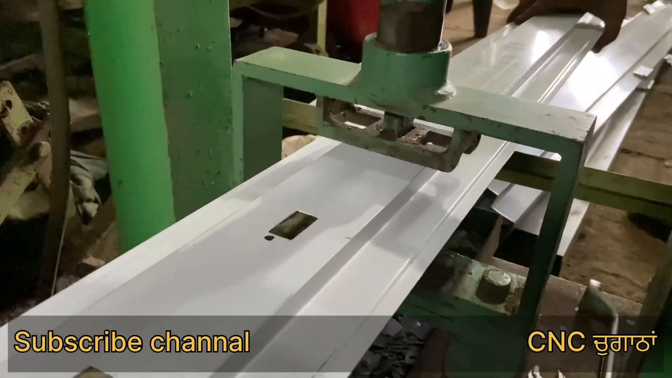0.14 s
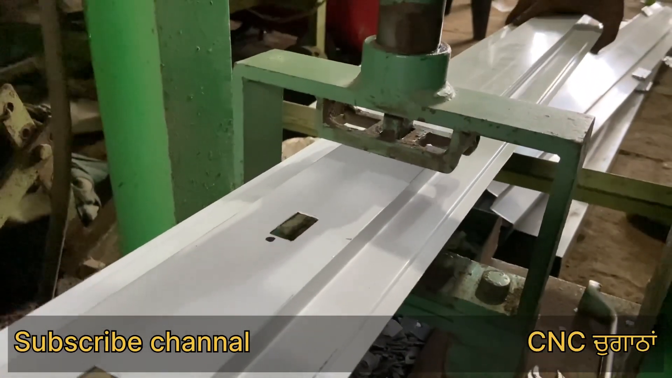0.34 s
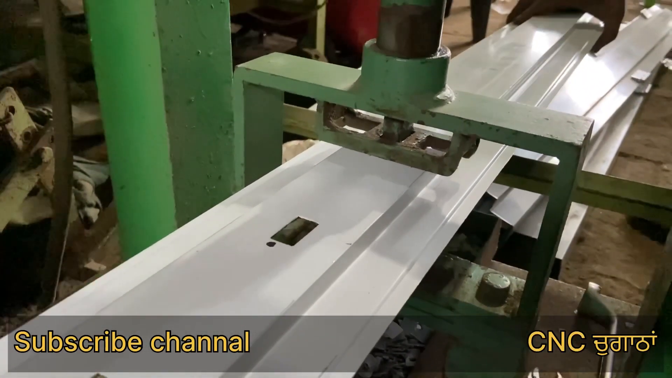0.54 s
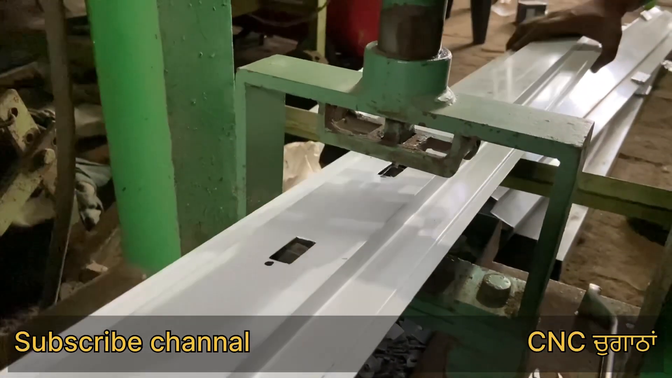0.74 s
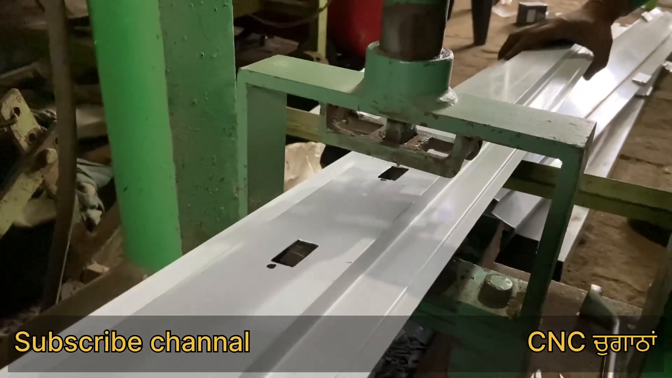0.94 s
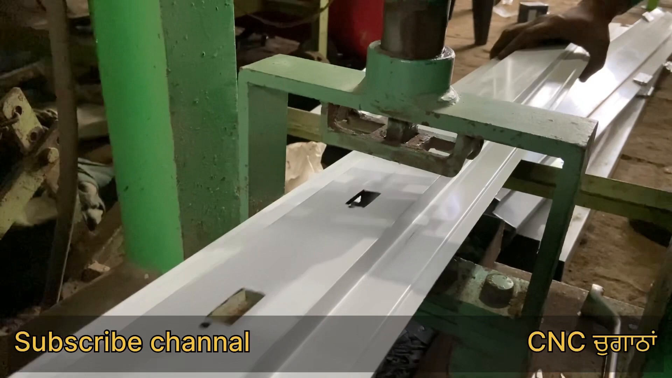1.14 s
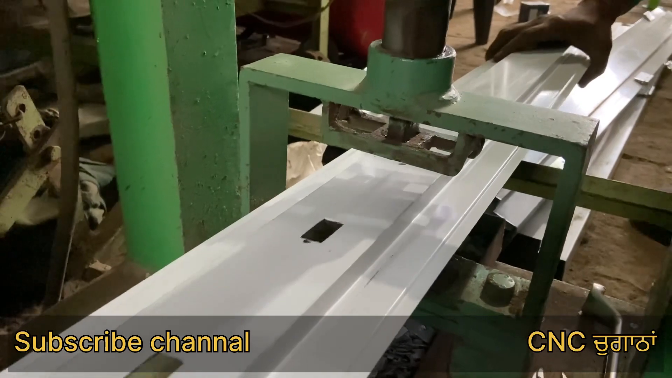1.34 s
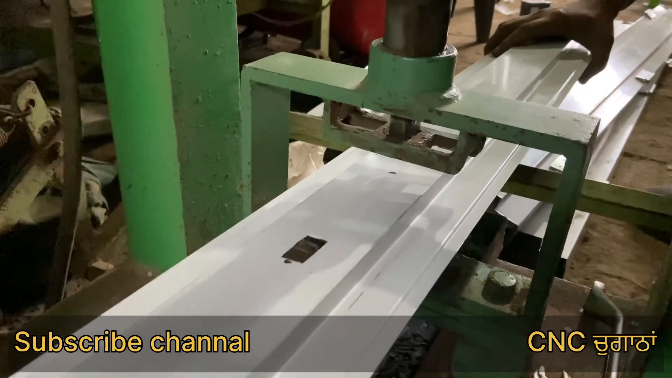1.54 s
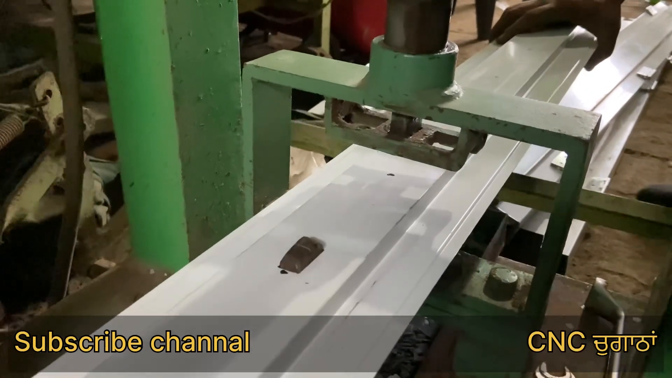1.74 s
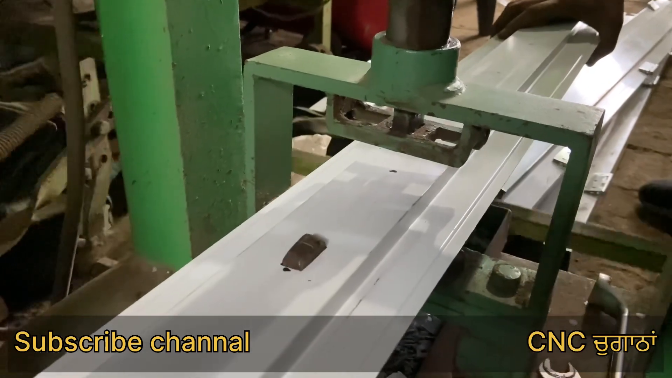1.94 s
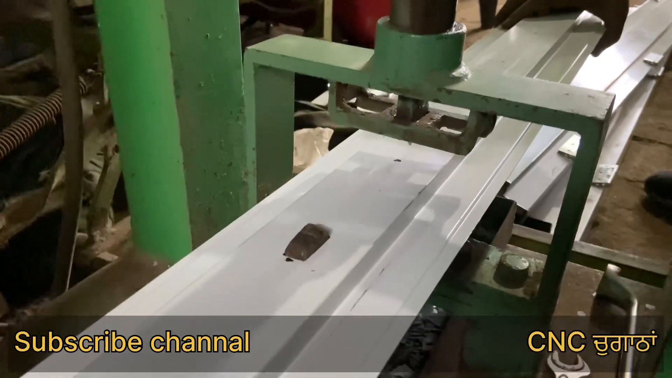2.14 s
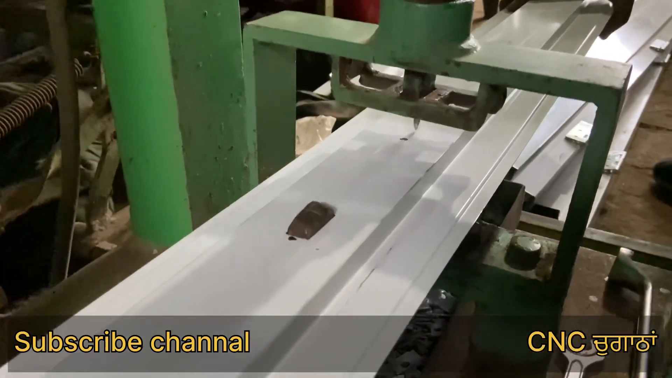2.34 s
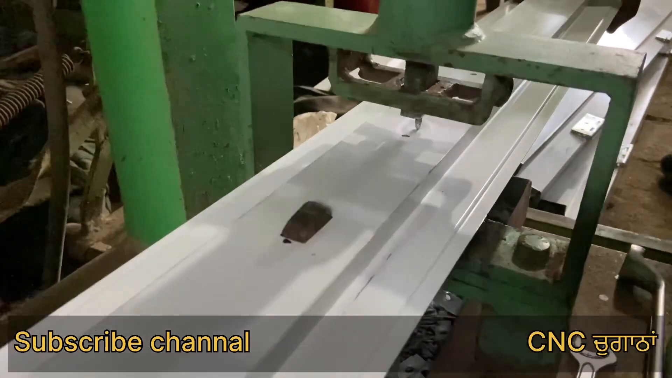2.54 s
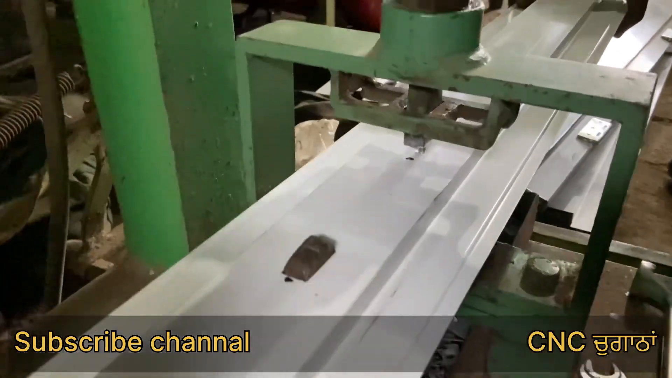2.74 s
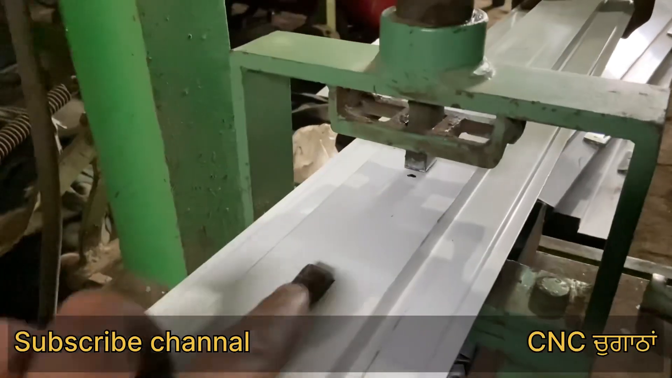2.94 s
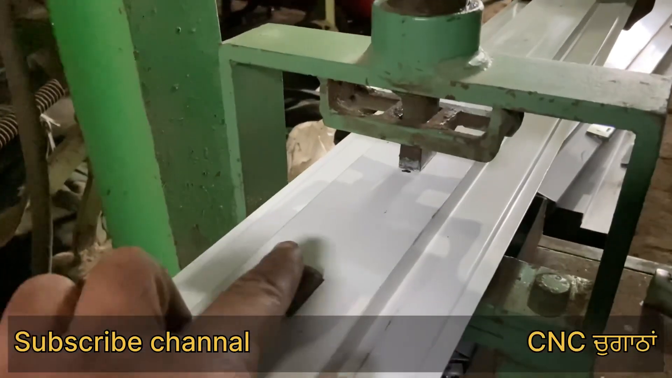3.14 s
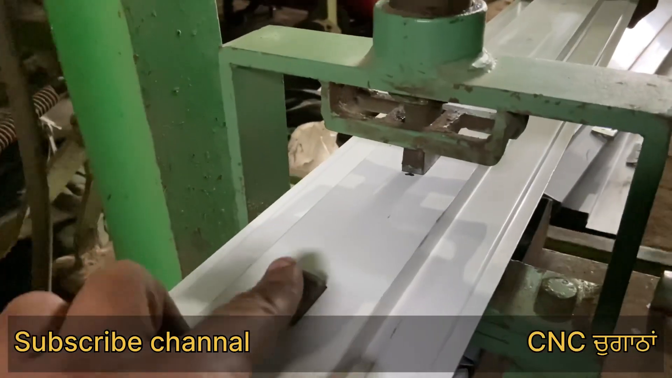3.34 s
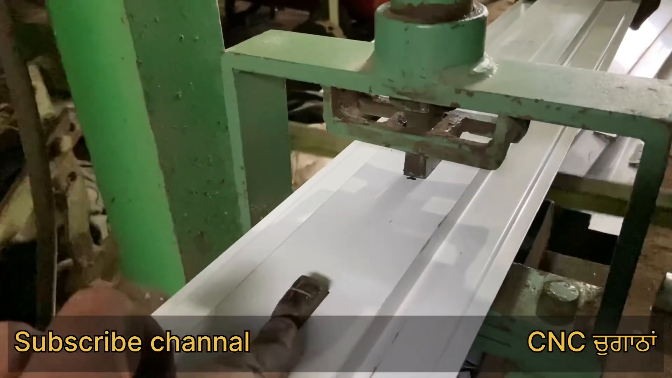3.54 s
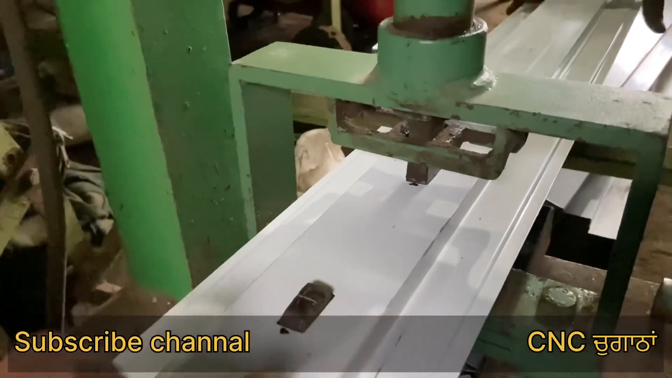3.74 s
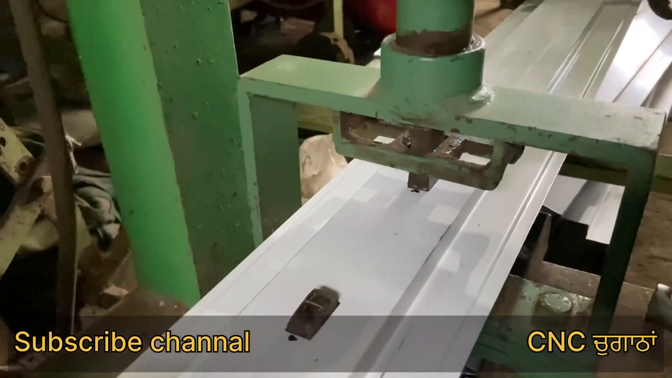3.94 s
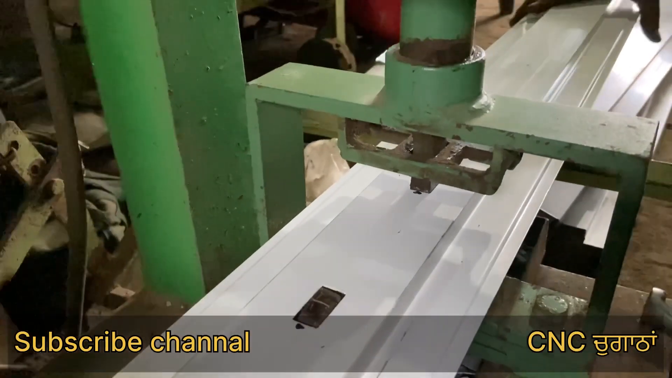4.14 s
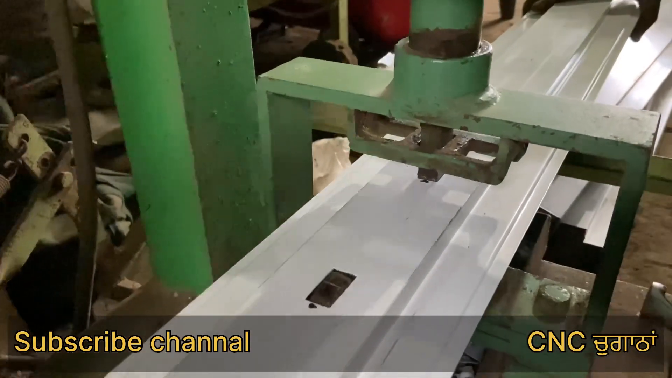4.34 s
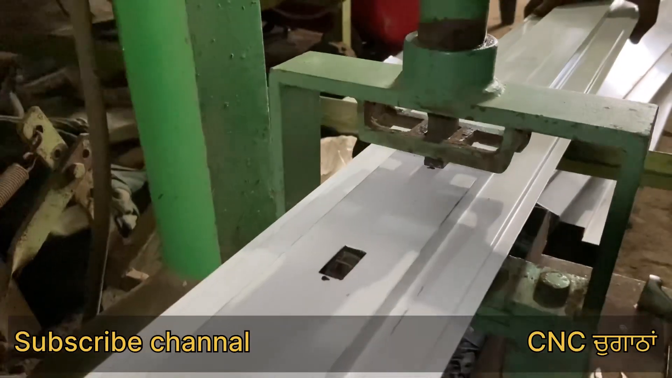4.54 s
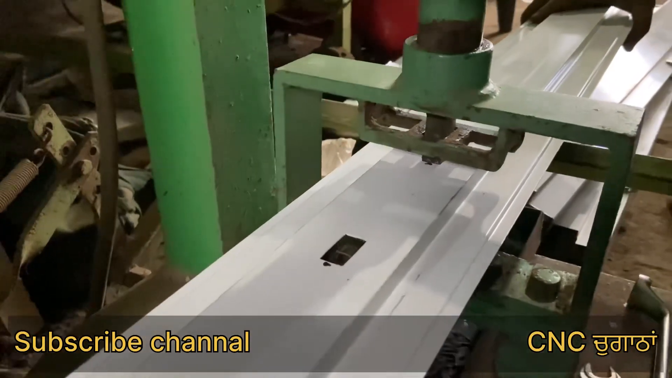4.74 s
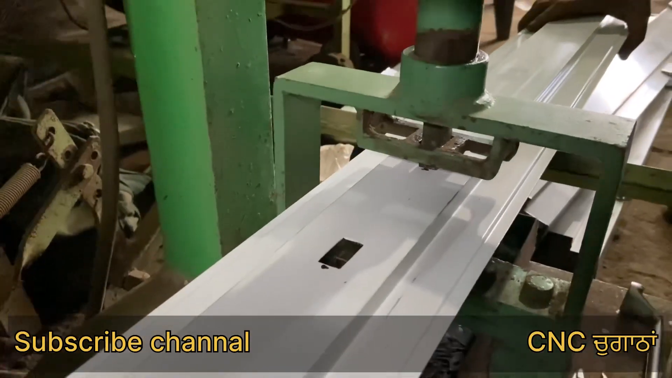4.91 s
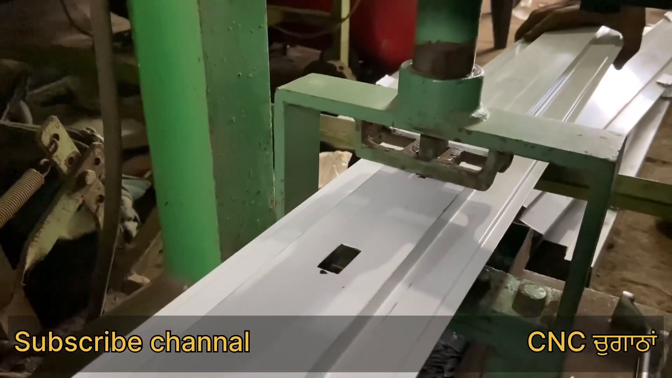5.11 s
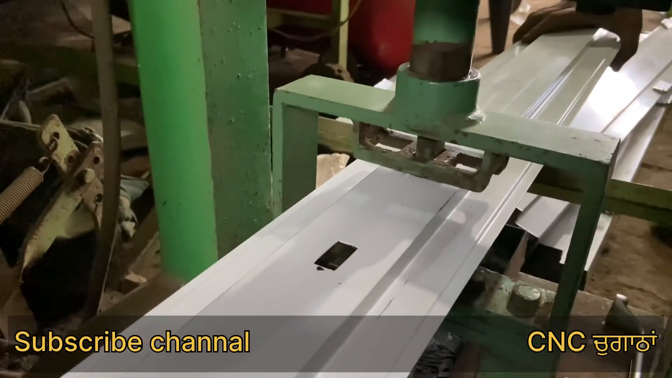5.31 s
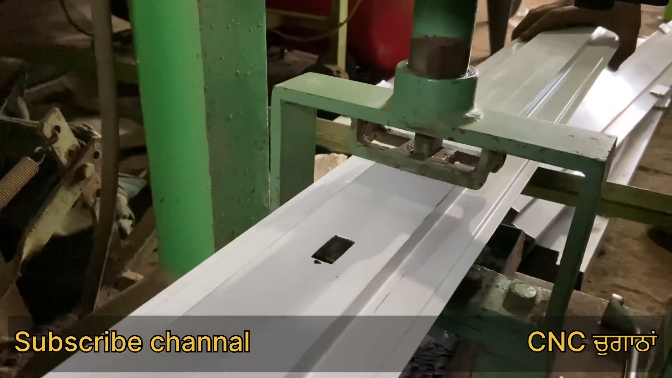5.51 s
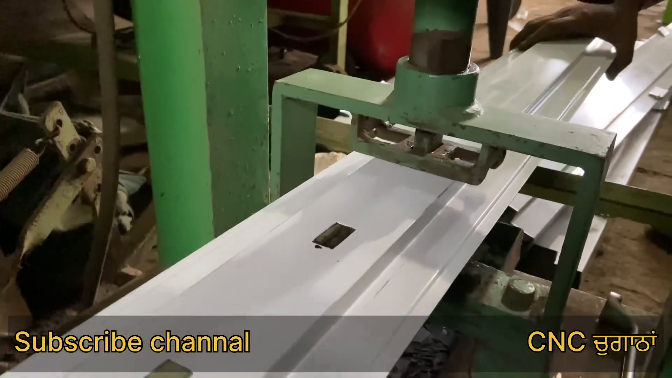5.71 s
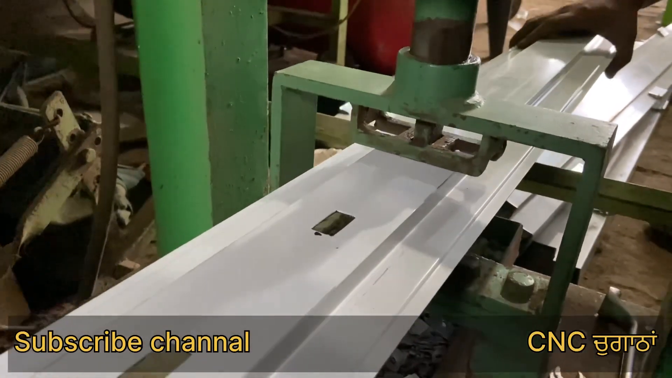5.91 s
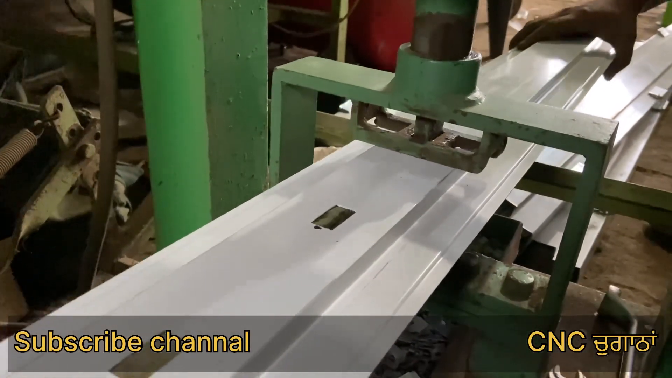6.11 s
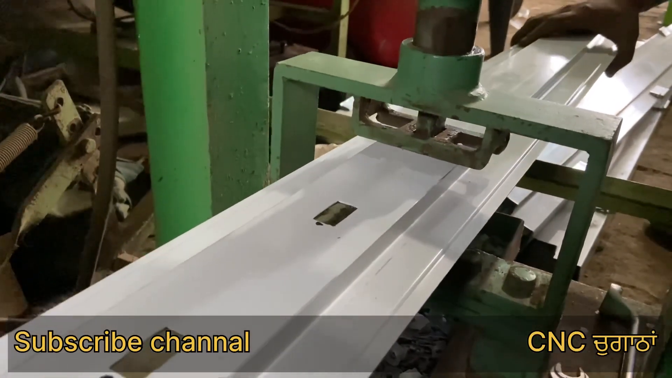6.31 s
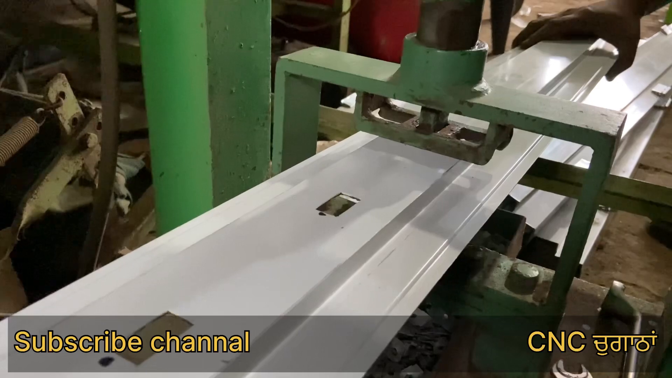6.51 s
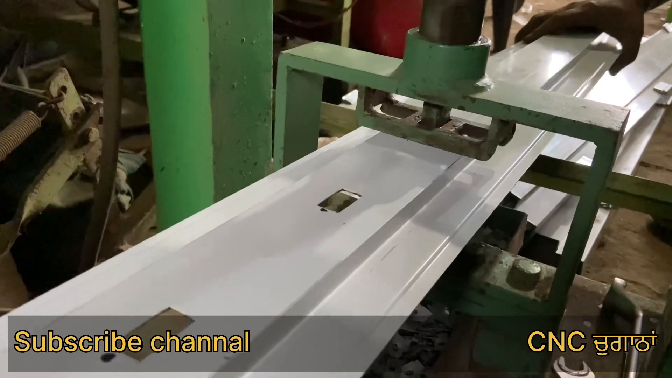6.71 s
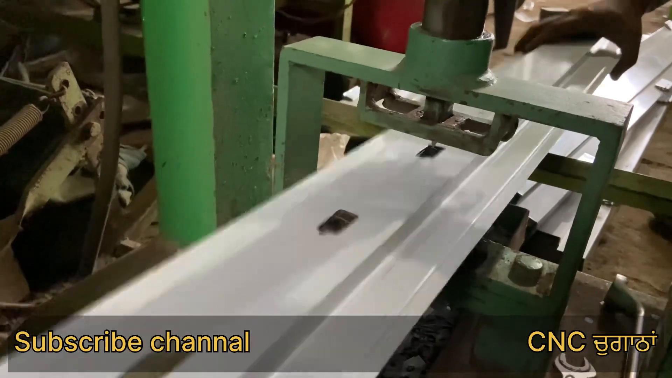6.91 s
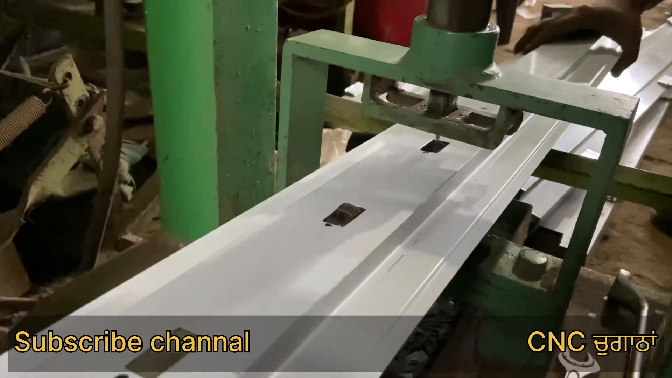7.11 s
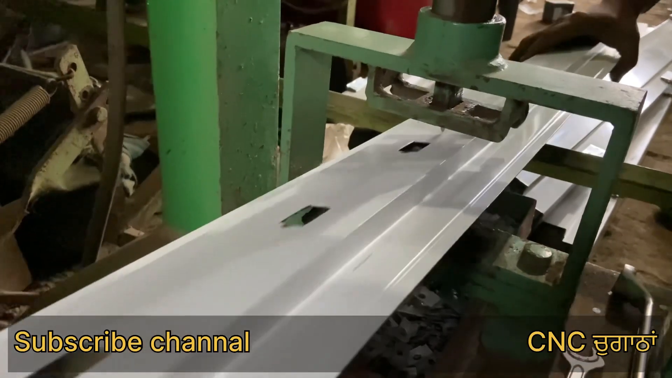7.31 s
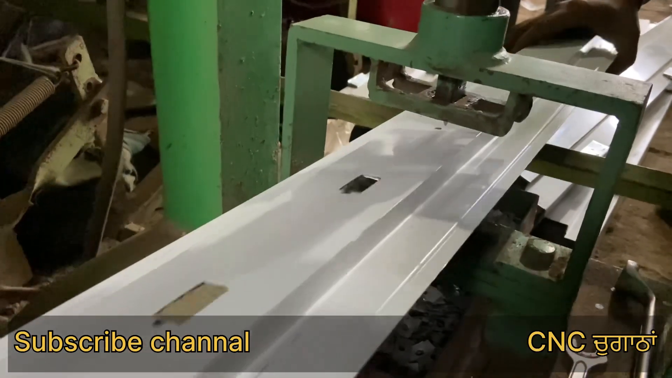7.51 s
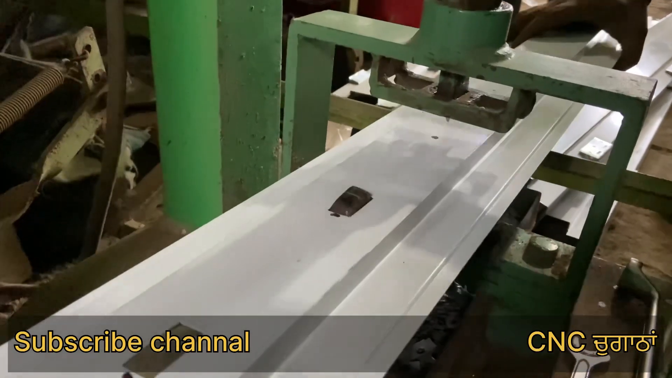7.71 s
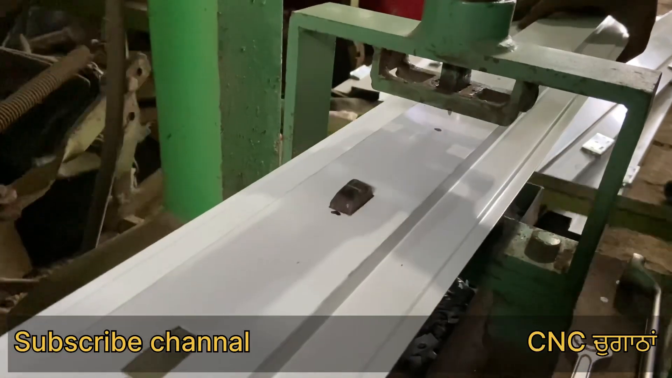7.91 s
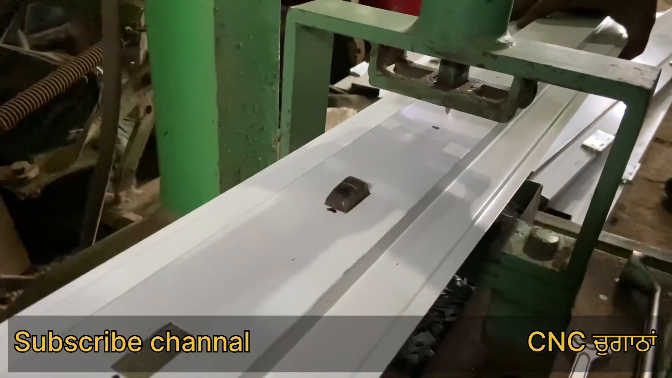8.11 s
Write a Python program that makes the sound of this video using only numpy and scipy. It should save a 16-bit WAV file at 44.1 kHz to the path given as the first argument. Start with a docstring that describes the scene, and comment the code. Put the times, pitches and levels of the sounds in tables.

```python
"""A flywheel press runs with a steady rumble and hum (coloured noise, beating sines); soon it bangs through
a long steel profile, and later again: contacts are noise bursts that set decaying sheet modes ringing.
The sheet slides (friction noise) and squeals on the die (harmonic stick-slip tones); hard edges snap.
Now and then the loaded drive drones and throbs (resonant noise modulated at shaft rate). A metal clack ends
the longest spell; a scrap pings and a faint whine passes. The gain ducks after loud bangs."""
import sys
import numpy as np
from scipy import signal
from scipy.fft import rfft, irfft, next_fast_len
from scipy.io import wavfile
from scipy.ndimage import uniform_filter1d, map_coordinates

SR = 44100
rng = np.random.default_rng(int(sys.argv[2]) if len(sys.argv) > 2 else 0)


def materialize(psi):
    """Save the field psi as 16-bit PCM at rate SR to the path in sys.argv[1].

    A 1-D psi becomes a single channel; in a 2-D psi each row is a channel.
    """
    bounded = np.clip(np.atleast_2d(psi).T, -1, 1)
    quanta = np.round(bounded * 32767).astype(np.int16)
    wavfile.write(sys.argv[1], SR, quanta)


N = 359845

# modes of the steel profile: f/Hz, level/dB touched at place 0, at place 1, at place 2, t60/s
STEEL_MODES = [(548, -6, -10, 1, 0.13), (605, -6, 5, -6, .2), (703, -1.5, -5.5, -13, 0.67),
               (842, 4, 1, -6, 0.36), (950, -1, -7, -14, 0.55), (1037, 6.5, -6, -11, .43),
               (1104, -18, -3, 2, .25), (1190, -10, -2.5, -10, 0.74), (1246, -26, -7, -5, 0.61),
               (1291, -16, -9, 0, .85), (1325, -4, -16, -16, .25), (1400, -10, -6, -22, .28),
               (1617, -11, -7, -6, .2), (1880, -9, 0, 4, 0.38), (2060, -8, -25, -12, .3),
               (2246, -14, -1, 3, 0.23), (2357, -3.5, -25, -9, 0.5), (2410, -2, -14, -14, .35),
               (2444, -10, 5.5, 1, 0.3), (2637, -30, -26, 7, .2), (2760, -14, 3, -14, 0.27),
               (2925, -10, 5, -5, .12), (3104, -5, 2, -3, .17), (3410, -21, 3, 0, .13),
               (3532, -4, 0, -11, .28), (3900, -3, -3, -16, 0.15), (4216, -8, 1, 1, 0.17),
               (4620, -3, -2, -5, .11), (7470, 6, 10.5, -10, 0.14)]
# spectrum of the press frame: f/Hz, relative level/dB
FRAME_SPECTRUM = [(25, -31), (65, -1.5), (130, 7), (300, -2), (520, -1.5), (750, -13), (1500, -40)]
# left-right correlation of the press sound: f/Hz, correlation [-1 to 1]
PRESS_CORRELATION = [(60, 1), (150, 0.86), (380, 0.78), (950, 0.023), (2380, 0.23), (5980, 0.43),
                     (15000, -0.38)]
# left-right correlation of the steel sounds: f/Hz, correlation [-1 to 1]
STEEL_CORRELATION = [(100, 0.99), (500, 0.93), (1200, 0.044), (3000, 0.5), (10000, 0.29)]


def amp(db):
    """Decibels to amplitude ratio: 20 dB is a factor of ten."""
    return 10 ** (np.asarray(db) / 20)


def unit(x):
    """Normalisation to an rms of 1."""
    return x / np.sqrt(np.mean(x ** 2) + 1e-20)


def along(points, hz):
    """Interpolation of (f/Hz, value) points on a logarithmic frequency axis."""
    f, v = np.transpose(points)
    return np.interp(np.log(hz + 1), np.log(f + 1), v)


def curves(rows):
    """Linear interpolation in time: one value per sample for each column after t/s."""
    s, *cols = np.transpose(rows)
    return [np.interp(np.arange(N) / SR, s, c) for c in cols]


def wobble(rate):
    """Band-limited random modulation: a smooth curve through `rate` random knots a second."""
    knots = rng.standard_normal(int(N * rate / SR) + 4)
    return map_coordinates(knots, [np.arange(N) * rate / SR])


def filtered(x, response):
    """Linear filtering: the spectrum of x times a complex response of frequency."""
    n = x.shape[-1]
    m = next_fast_len(n + SR // 8)  # zero padding against wrap-around
    return irfft(rfft(x, m) * response(np.fft.rfftfreq(m, 1 / SR)), m)[..., :n]


def shape(points):
    """Spectral envelope: the response through (f/Hz, level/dB) points."""
    return lambda hz: amp(along(points, hz))


def resonances(modes):
    """Sum of (f/Hz, width/Hz, level/dB) resonances, squared to steepen their skirts."""
    def response(f):
        return sum(amp(db) * np.abs(f * w / (c * c - f * f + 1j * f * w)) ** 2 for c, w, db in modes)
    return response


def noise(response, alike, size=N):
    """Partial coherence: mid and side noises mix to coloured stereo of rms 1 with a set correlation."""
    turn = lambda hz: np.arccos(np.clip(along(alike, hz), -1, 1)) / 2
    weights = lambda hz: response(hz) * [np.cos(turn(hz)), np.sin(turn(hz))]
    mid, side = filtered(rng.standard_normal((2, size)), weights)
    return unit(np.array([mid + side, mid - side]))


def dying(x):
    """Frequency-dependent damping: each band of x decays at the pace of the steel and the room."""
    # dense overtones and room: f/Hz, t60/s
    decay_times = [(70, 0.45), (300, 0.074), (1000, 0.69), (3000, 0.38), (6000, 0.3), (14000, 0.15)]
    hz, t, z = signal.stft(x, SR, nperseg=256)
    z = z * amp(-60 * t / along(decay_times, hz)[:, None])
    return signal.istft(z, SR, nperseg=256)[1][:, :x.shape[1]]


def envelope(t, length, rise, t60):
    """Linear rise, hold until `length`, then exponential decay; t counts from the start."""
    return np.clip(t / rise, 0, 1) * amp(-60 * np.maximum(t - length, 0) / t60)


def add(track, s, sound):
    """Superposition: mix a sound in at time s."""
    start = round(s * SR)
    track[:, start:start + sound.shape[1]] += sound[:, :N - start]


def mode_levels(place):
    """Modal participation: the level in dB of each sheet mode depends on the place of contact."""
    return np.array([np.interp(place, np.arange(len(dbs)), dbs) for hz, *dbs, t60 in STEEL_MODES])


def idling(level_db=-28.5, housing_db=-16, waver=0.41, shudder_swing_db=2):
    """Steady excitation: motor and flywheel make a rumble, housing resonances, hum lines and a shudder."""
    # the running press: f/Hz, relative spectral density/dB
    rumble_spectrum = [(20, -46), (43, -30), (64, -8), (102, -1.5), (249, -10), (373, -17), (575, -17.5),
                       (900, -27), (1400, -36), (2550, -36), (7000, -46), (16000, -67)]
    # housing resonances: f/Hz, width/Hz, relative level/dB
    housing_modes = [(570, 214, -0.5), (1165, 500, -8.5), (1588, 39, -4), (2135, 89, -10),
                     (2604, 250, -9.5)]
    # hum lines: f/Hz, mean level/dB
    hum_lines = [(91.5, -37.5), (98.7, -39.5), (120, -38.5), (170, -41.5), (200, -47), (258.4, -50),
                 (511, -50), (807, -62), (827, -59.5), (1034, -59.5), (1120, -61.5), (1593, -73)]
    # the frame's deep shudder: t/s, mean level/dB
    shudder_levels = [(.08, -30.5), (.3, -44.5), (1.6, -39), (3.25, -42), (3.45, -44), (6.2, -47.5),
                      (8.16, -42)]
    t = np.arange(N) / SR
    rumble = noise(shape(rumble_spectrum), PRESS_CORRELATION) * amp(-1.0 + 1.32 * wobble(14))
    housing = noise(resonances(housing_modes), PRESS_CORRELATION) * amp(housing_db + 0.29 * wobble(11))
    hum = 0
    for hz, db in hum_lines:
        line = np.sqrt(2) * np.sin(2 * np.pi * hz * t + waver * wobble(6.5))
        hum = hum + amp(db + 1.8 * wobble(7.1)) * line
    shudder_db, = curves(shudder_levels)
    shudder = noise(resonances([(54, 22, 0)]), PRESS_CORRELATION)
    shudder = shudder * amp(shudder_db + shudder_swing_db * wobble(4.3))
    return amp(level_db) * (rumble + housing) + hum + shudder


def sliding(grain_db=0.6, sing=0.66, pivot_hz=2500, place=1.5, burr_db=-3.5, burr_swing_db=1.2,
            catch_db=-10, catches_per_s=420, catch_s=.0012, t60=0.26):
    """Dry friction: each push hisses, stirs the sheet's modes and makes the cut edge rasp unevenly."""
    # pushes over the table: t/s, length/s, rise/s, level/dB, brightness/(dB per octave)
    pushes = [(.5, .1, .02, -71, 9), (.99, 0.12, .08, -42, -3), (1.12, 0.32, .08, -49.5, -2.5),
              (1.504, 0.13, .04, -50, 1.5), (1.9, 1.15, .03, -50, -0.5), (3.47, 0.21, .14, -39.5, -3),
              (3.74, .31, .15, -54.5, 3.5), (7.322, 0.16, .008, -36, -1.5), (7.48, .11, .07, -35.5, -3),
              (7.984, 0.045, .02, -49, 2)]
    # friction hiss: f/Hz, relative spectral density/dB
    scrape_spectrum = [(400, -24), (900, -9), (1500, -16.5), (2600, -17.5), (5500, -17), (8000, -25.5),
                       (15000, -30.5)]
    # rasp of the cut edge: f/Hz, width/Hz, relative level/dB
    burr_modes = [(2070, 90, -3), (2440, 90, -4), (2900, 200, -6), (3540, 100, -2), (3970, 70, -1),
                  (4200, 140, 1), (4490, 110, -3), (5600, 350, -8)]
    stirred = [(row[0], 45, db) for row, db in zip(STEEL_MODES, mode_levels(place)) if row[0] < 5000]
    burr = unit(noise(resonances(burr_modes), STEEL_CORRELATION) * amp(burr_swing_db * wobble(90)))
    hiss = noise(shape(scrape_spectrum), STEEL_CORRELATION)
    singing = noise(resonances(stirred), STEEL_CORRELATION)
    rubbing = hiss + sing * singing + amp(burr_db) * burr
    # the sheet catches on the table at random moments, each catch decaying exponentially
    catches = (rng.random(N) < catches_per_s / SR) * rng.exponential(size=N)
    catches = signal.lfilter([1], [1, -np.exp(-1 / (catch_s * SR))], catches)
    grain = amp(grain_db * wobble(180) + 0.5 * wobble(23))
    rubbing = unit(rubbing * (1 + amp(catch_db) * catches) * grain)
    out = np.zeros((2, N))
    for s, length, rise, db, bright_db in pushes:
        stretch = rubbing[:, round(s * SR):round((s + length + t60) * SR)]
        # the tilt stops an octave below the pivot
        stretch = filtered(stretch, lambda hz: amp(bright_db * np.log2(np.maximum(hz / pivot_hz, .5))))
        t = np.arange(stretch.shape[1]) / SR
        add(out, s, amp(db) * stretch * envelope(t, length, rise, t60))
    return out


def snaps(t60=0.0096, rise=0.0024, tail_db=-18):
    """Impulsive radiation: a hard steel edge snaps as a very short bright crack with a faint tail."""
    # snapping edges: t/s, level/dB
    snap_levels = [(.577, -43), (.701, -14), (.772, -27), (1.405, -28), (1.575, -38), (2.387, -43),
                   (2.432, -23), (2.439, -26), (3.2877, -10), (4.051, -34), (6.776, -42), (6.988, -33),
                   (7.557, -29)]
    out, t = np.zeros((2, N)), np.arange(SR // 4) / SR
    spectrum = shape([(2000, -10), (7000, -6.5), (16000, 0.5)])
    bright = lambda: noise(spectrum, STEEL_CORRELATION, size=len(t))
    for s, db in snap_levels:
        crack = bright() * envelope(t, rise, rise, t60)
        tail = amp(tail_db) * np.minimum(t / rise, 1) * dying(bright())
        add(out, s, amp(db) * (crack + tail))
    return out


def blows(impact_t60=0.1, crack_t60=0.0031, crack_db=-4.0, attack=0.00044, spread=0.58,
          mode_width=0.031, uneven_db=5.5, body_db=-2.5, chatter_db=2.5, tint_db=9, hit_db=2, hit_t60=.014):
    """Modal excitation by impact: a crack and chattering crash, then the sheet's modes ring freely."""
    # steel contacts: t/s, level/dB, hardness/dB (treble gained, body lost), ring of the modes/dB,
    # place along the sheet [0 = near its end, 1 = further in, 2 = furthest]
    contacts = [(.624, -52, -21, -4, 0), (.677, -18, 0.5, -7, 0.2), (.702, -16.3, -1.5, -6.5, 0.14),
                (.712, -24, -10, -13, 0.043), (.721, -26.5, -2, -11, 0), (.773, -28.5, 0.5, -7, 0.22),
                (1.408, -38, -3.5, -0.5, 0.62), (1.576, -28.5, -1.5, -13, 0.67), (2.435, -40, 8, -20, 0.4),
                (4.054, -54, 17.5, -20, 0.15), (6.899, -34, -5, -11, 1.2), (6.910, -17, 0.5, -13, 1),
                (6.918, -18.5, -3, -12, 1.22), (6.923, -21, 1, -14, 1.1), (6.957, -35, -3, -8, 1.4),
                (6.992, -30.5, 1, -12, 1.3), (7.016, -40, -1, -4, 1), (7.11, -46, -6, -12, 1.7),
                (7.3223, -32.5, -3, -18, 0.4), (7.521, -41, -13, -8, 1.7), (7.534, -38, -11, -7, 1.6),
                (7.558, -27, -2, -13, 1.2), (7.579, -31, -7, -15, 1.8), (7.585, -26.5, -6.5, -13, 2),
                (7.591, -25.5, -2.5, -18, 2.4)]
    # sheet flexing: f/Hz, relative level/dB
    body_spectrum = [(120, -32), (300, -13), (500, -2.5), (700, -3), (1000, -6.5), (1500, -4.5),
                     (3000, -23), (8000, -56)]
    # steel on steel: f/Hz, relative level/dB
    clang_spectrum = [(500, -55), (1200, -12.5), (1900, 0.5), (2600, -2), (3300, -2), (4100, -2),
                      (5000, -6), (6500, -2), (12000, -54)]
    # sharp edges: f/Hz, relative level/dB
    edge_spectrum = [(1500, -44), (4000, 0), (5300, 6), (7500, -10.5), (10500, 4.5), (16000, -12)]
    edge_db, thud_db = -5.5, -1.5  # edges relative to the contact, frame relative to the body
    tail_db, tail_per_ring = -5, 0.3  # dense overtones follow the ring of the modes
    beat_hz, beat_depth = 12.95, 0.42  # a mode is a close pair: spacing scale, weaker partner's size
    detune_share = .004  # the clamping shifts the modes by about this share from blow to blow

    out, t = np.zeros((2, N)), np.arange(SR * 3 // 4) / SR
    grid = np.linspace(0, SR / 2, SR // 8)
    bands = [FRAME_SPECTRUM, body_spectrum, clang_spectrum, edge_spectrum]
    sizes = [np.sqrt(np.mean(shape(band)(grid) ** 2)) for band in bands]
    mode_hz, *_, mode_t60 = np.transpose(STEEL_MODES)
    count = len(mode_hz)
    swing = amp(-60 * t / mode_t60[:, None]) * np.exp(2j * np.pi * mode_hz[:, None] * t)
    # countless weak overtones make the treble of the steel uneven
    comb_hz = np.geomspace(2000, 16000, 420)
    comb_db = uneven_db * rng.standard_normal(len(comb_hz)) * (comb_hz > comb_hz[0])
    comb = shape(np.column_stack([comb_hz, comb_db]))
    chatter = amp(chatter_db * wobble(350))
    for s, level_db, hard_db, modes_db, place in contacts:
        # a harder contact trades the sheet's body for its edges
        flex_db = level_db + body_db - hard_db
        band_db = [flex_db + thud_db, flex_db, level_db, level_db + hard_db + edge_db]

        def colour(hz):
            parts = zip(band_db, bands, sizes)
            return np.sqrt(sum((amp(db) * shape(band)(hz) / size) ** 2 for db, band, size in parts))

        force = np.sqrt(np.mean(colour(grid) ** 2))
        # the place of contact sets the modes' strengths; damped by the tool, they also colour the crash
        mode_db = mode_levels(place)
        damped = resonances(list(zip(mode_hz, mode_width * mode_hz, mode_db)))
        tint = colour(grid) * (comb(grid) + amp(tint_db) * damped(grid))
        tinted = lambda hz: np.interp(hz, grid, tint)
        burst = lambda: force * noise(tinted, STEEL_CORRELATION, size=len(t))
        crack = noise(shape([(2000, -25), (12000, 14)]), STEEL_CORRELATION, size=len(t))
        crack = crack * amp(band_db[-1] + crack_db - 60 * t / crack_t60)
        rattle = amp(-60 * t / impact_t60) * np.roll(chatter, -round(s * SR))[:len(t)]
        crash = burst() * np.hypot(rattle, amp(hit_db - 60 * t / hit_t60))
        tail = amp(tail_db + tail_per_ring * modes_db) * dying(burst())
        # each mode reaches the two channels with its own phase
        scatter_db = 2 * rng.standard_normal(count)
        phase = rng.uniform(0, 2 * np.pi, count) + spread * rng.standard_normal((2, count))
        detune, spacing, lag = rng.standard_normal((3, count, 1))
        shift = np.exp(2j * np.pi * detune_share * detune * mode_hz[:, None] * t)
        beating = 1 + beat_depth * np.exp(2j * np.pi * (beat_hz * spacing * t + lag))
        strength = colour(mode_hz) * amp(mode_db + modes_db + scatter_db - 11) * np.exp(1j * phase)
        ring = (strength @ (swing * shift * beating)).real
        add(out, s, (crack + crash + tail + ring) * (1 - np.exp(-t / attack)))
    return out


def jolts(frame_hz=66, t60=0.34, rise=0.011, thud_t60=0.1, thud_rise=0.00082):
    """Damped oscillation of a heavy mass: the ram jolts the frame, which thuds and swings briefly."""
    # ram jolts: t/s, thud level/dB, swing level/dB
    strokes = [(.711, -20, -21.5), (3.291, -11, -37), (6.92, -17, -13.5)]
    out, t = np.zeros((2, N)), np.arange(SR // 2) / SR
    for s, thud_db, swing_db in strokes:
        thud = noise(shape(FRAME_SPECTRUM), STEEL_CORRELATION, size=len(t))
        thud = amp(thud_db) * envelope(t, 0, thud_rise, thud_t60) * thud
        swing = amp(swing_db - 60 * t / t60) * np.sin(2 * np.pi * frame_hz * t)
        add(out, s, thud + swing * (1 - np.exp(-t / rise)))
    return out


def squeals(wet_db=-10.5, ring_db=-18, rough=0.011, judder_db=1.8, swell_share=0.86):
    """Stick-slip: a short rough harmonic tone swells, breaks off and rings on in sheet and room."""
    # slips on the die: t/s, length/s, f/Hz, level/dB, hardness [0-1], glide [share of the pitch]
    slips = [(1.592, 0.016, 2976, -14.5, 0.6, -.012), (1.606, 0.011, 2814, -9.5, 0.7, -.02),
             (1.615, 0.012, 2760, -23, .8, -.01), (1.943, 0.012, 2335, -31, 0.05, .025),
             (1.96, .008, 2316, -39, 0, 0), (1.97, 0.012, 2350, -32.5, 0, .035),
             (1.981, 0.032, 2393, -29.5, 0.03, 0), (7.515, 0.021, 1095, -28, 0, 0),
             (7.536, 0.026, 1100, -29, 0, 0), (7.99, 0.018, 2350, -39, 0.03, .02),
             (8.007, .026, 2380, -32.5, .03, .005)]
    # harmonic spectrum: multiple of the pitch, level/dB in a light slip, level/dB in a hard one
    overtones = [(1, 4.5, -0.5), (1.5, -60, -6), (2, -23.5, -6), (3, -18, -32), (4, -39, -21),
                 (5, -38, -40)]
    # sheet modes left ringing: f/Hz, relative level/dB, t60/s
    ringing_modes = [(2750, -16, 0.19), (2825, -28, 0.42), (2988, -35, .5), (4095, -7, .22),
                     (4230, -13, .14), (5539, -2, 0.27), (5700, -10, 0.3)]
    out, t = np.zeros((1, N)), np.arange(SR // 2) / SR
    shake, judder = 1 + rough * wobble(450), amp(judder_db * wobble(300))
    for s, length, hz, db, hardness, glide in slips:
        u = np.linspace(0, 1, round(length * SR))
        start = round(s * SR)
        pitch = hz * (1 + glide * (u - .5)) * shake[start:][:len(u)]
        phase = 2 * np.pi * np.cumsum(pitch) / SR
        wave = sum(amp(light + hardness * (hard - light)) * np.sin(k * phase) for k, light, hard in overtones)
        swell = np.sin(np.pi / 2 * np.interp(u, [0, swell_share, 1], [0, 1, 0]))
        add(out, s, (amp(db) * swell * judder[start:][:len(u)] * wave)[None])
    room = dying(noise(np.ones_like, STEEL_CORRELATION, size=len(t)))
    ring = sum(amp(db - 60 * t / t60) * np.sin(2 * np.pi * hz * t) for hz, db, t60 in ringing_modes)
    tail = amp(wet_db) * room / np.linalg.norm(room[0]) + amp(ring_db) * ring / np.linalg.norm(ring)
    delayed = np.pad(out, ((0, 0), (SR // 200, 0)))  # 5 ms
    return out + signal.fftconvolve(delayed, tail, axes=1)[:, :N]


def labouring(throb_db=3.0, surge_db=0.5, rasp_db=2.5, drone_hz=102.5, growl_hz=260, upper_hz=333):
    """Modulation at shaft rate: the loaded frame drones once a turn; growl and grind rub twice a turn."""
    # spells of load: t/s, length/s, rise/s, release t60/s, level/dB, initial drone re that level/dB
    loads = [(1.995, 1.261, 0.16, 0.29, -32.5, 14.5), (3.405, 0.22, 0.1, 1.46, -33.5, 2.5),
             (7.995, 0.14, 0.1, 0.34, -36, 16.5)]
    # drone resonances: f/Hz, width/Hz, relative level/dB
    drone_modes = [(108, 75, -3), (156, 10, -7.5)]
    # growl resonances: f/Hz, width/Hz, relative level/dB
    growl_modes = [(194, 53, -23), (278.6, 57, 0), (320.5, 18, -6.5)]
    # grinding: f/Hz, relative spectral density/dB
    grind_spectrum = [(220, -26), (380, -1), (630, 1), (950, -10.5), (1150, -4), (1360, -9.5), (2600, -15),
                      (5000, -35), (7500, -26), (15000, -120)]
    shaft_hz, rub_at_s = 6.3, 3.055  # turns a second; a moment when the shaft rubs
    # as the load lasts the drone fades and the growl builds
    drone_db_per_s, growl_db_per_s, growl_db = -4, 6.5, 2
    t = np.arange(N) / SR
    angle = 2 * np.pi * shaft_hz * (t - rub_at_s)
    rub = np.cos(2 * angle)
    tone = lambda hz: np.sqrt(2) * np.sin(2 * np.pi * hz * t + 1.0 * wobble(12))
    resonant = lambda modes: noise(resonances(modes), PRESS_CORRELATION)
    drone = tone(drone_hz) + 0.84 * resonant(drone_modes)
    drone = unit(drone * amp(surge_db * np.cos(angle) + 0.92 * wobble(9.2)))
    growl = tone(growl_hz) + .4 * tone(upper_hz) + .8 * resonant(growl_modes)
    growl = unit(growl * amp(throb_db * rub))
    grind = noise(shape(grind_spectrum), PRESS_CORRELATION) + 0.29 * resonant([(1139, 41, 0)])
    grind = unit(grind * amp(rasp_db * rub))
    out = np.zeros((2, N))
    for s, length, rise, t60, db, drone_db in loads:
        age = np.clip(t - s, 0, length + t60)
        mix = amp(drone_db + drone_db_per_s * age) * drone
        mix = mix + amp(growl_db + growl_db_per_s * age) * growl + grind
        out += amp(db) * envelope(t - s, length, rise, t60) * mix
    return out


def clack(at_s=3.289, crash_db=-14, hold=0.0055, t60=0.11, rise=0.00099, tail_db=-21, rub_db=-24,
          rub_s=0.021, rattle_db=2, knock_hz=190, knock_db=-11.5, knock_rise=.008, knock_t60=.035):
    """Broadband impact: heavy parts graze, slam with a dull knock and leave a dense rattling tail."""
    # the slam: f/Hz, relative spectral density/dB
    crash_spectrum = [(150, -17), (500, -0.5), (800, -7), (1100, -1), (1500, -10), (2000, -8.5),
                      (3500, -11), (5500, -18), (7500, -20), (15000, -46)]
    # the tail: f/Hz, relative spectral density/dB
    tail_spectrum = [(250, -25), (500, -7), (1100, -1), (1500, -4), (2000, -2), (4200, -6), (7300, -11.5),
                     (10500, -18), (15000, -35)]
    # the graze just before: f/Hz, relative spectral density/dB
    rub_spectrum = [(1000, -11), (3200, 2), (4800, -10), (6100, 4), (7500, -14), (15000, -24)]
    out, t = np.zeros((2, N)), np.arange(SR // 2) / SR
    burst = lambda points: noise(shape(points), STEEL_CORRELATION, size=len(t))
    graze = burst(rub_spectrum) * envelope(t, rub_s, rub_s, t60) ** 2
    crash = burst(crash_spectrum) * envelope(t, hold, rise, t60)
    knock = envelope(t, knock_rise, knock_rise, knock_t60) * np.sin(2 * np.pi * knock_hz * t)
    rattle = amp(rattle_db * wobble(200)[:len(t)])
    tail = dying(burst(tail_spectrum)) * np.minimum(t / hold, 1) * rattle
    add(out, at_s - rub_s, amp(rub_db) * graze)
    add(out, at_s, amp(crash_db) * crash + amp(knock_db) * knock + amp(tail_db) * tail)
    return out


def ping(at_s=4.049, rise=.002):
    """Free modal decay: a small scrap of steel drops and rings high and thin."""
    # modes of the scrap: f/Hz, level/dB, t60/s
    scrap_modes = [(9932, -45, .2), (10760, -57, .09), (14950, -50, .08)]
    out, t = np.zeros((2, N)), np.arange(SR // 3) / SR
    for hz, db, t60 in scrap_modes:
        add(out, at_s, (amp(db) * envelope(t, 0, rise, t60) * np.sin(2 * np.pi * hz * t))[None])
    return out


def whine(waver=.15, swing_db=1.2):
    """Narrow-band tone: slight phase and level modulation of a sine gives a faint, brief whine."""
    # t/s, length/s, rise/s, release t60/s, f/Hz, mean level/dB
    s, length, rise, t60, hz, db = (7.895, .225, .05, .12, 468.3, -38.5)
    t = np.arange(N) / SR
    tone = np.sqrt(2) * np.sin(2 * np.pi * hz * t + waver * wobble(15))
    return amp(db + swing_db * wobble(20)) * envelope(t - s, length, rise, t60) * tone


def scene(lead_ms=0.025):
    """Interaural cues: the steel lies a little left, so it arrives there earlier and louder."""
    # level difference of the steel: f/Hz, left minus right/dB
    steel_balance = [(200, 12.5), (600, 2.5), (1500, 1.5), (4000, 0.5)]
    sides = np.array([[.5], [-.5]])
    steel = sliding() + snaps() + blows() + squeals() + clack() + ping()

    def placement(hz):
        lead = np.exp(2j * np.pi * hz * lead_ms / 1000 * sides)
        return amp(along(steel_balance, hz) * sides) * lead

    return idling() + filtered(steel, placement) + jolts() + labouring() + whine()


def record(dry, threshold_db=-17, squeeze=0.15, attack_s=0.045, recover_db_per_s=4, ceiling_db=3.0,
           top_hz=16200):
    """Compression and band limiting: gain ducks after loud bangs, peaks round off, the top is cut."""
    # channel sensitivity: f/Hz, left minus right/dB
    channel_balance = [(60, -0.5), (150, 3), (380, 2.0), (950, 2), (2380, 1.5), (5980, 1.5), (15000, -1.5)]
    x = filtered(dry, lambda hz: amp(along(channel_balance, hz) * np.array([[.5], [-.5]])))
    power = uniform_filter1d(np.mean(x ** 2, axis=0), size=441)  # over 10 ms
    level_db = 10 * np.log10(np.abs(power) + 1e-12)
    # a running maximum holds each duck while it recovers at a steady rate
    recovery = recover_db_per_s * np.arange(N) / SR
    excess_db = squeeze * np.maximum(level_db - threshold_db, 0)
    duck_db = np.maximum.accumulate(excess_db + recovery) - recovery
    pole = np.exp(-1 / (attack_s * SR))
    x = x * amp(-signal.lfilter([1 - pole], [1, -pole], duck_db))
    x = x / (1 + np.abs(x / amp(ceiling_db)) ** 10) ** (1 / 10)
    return filtered(x, lambda hz: 1 / np.sqrt(1 + (hz / top_hz) ** 120))


dry = scene()
out = record(dry)
materialize(out)
```